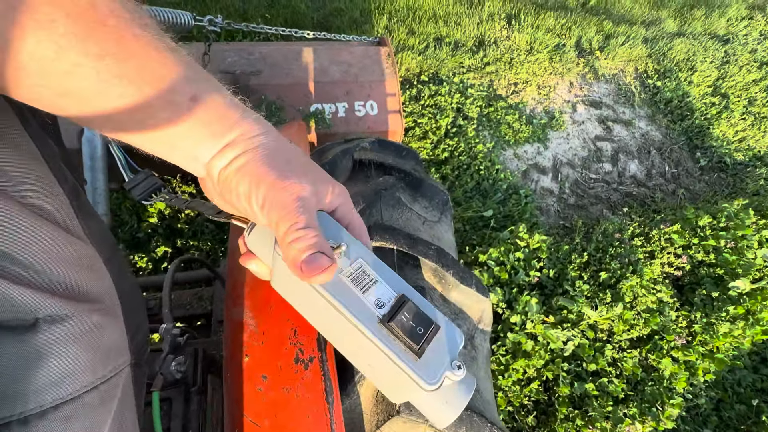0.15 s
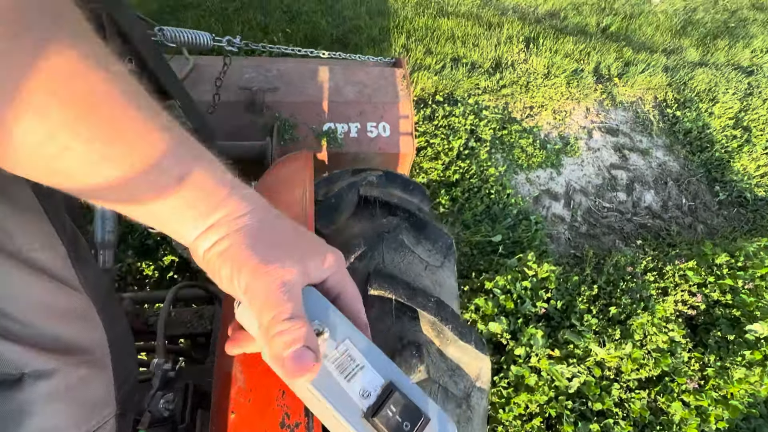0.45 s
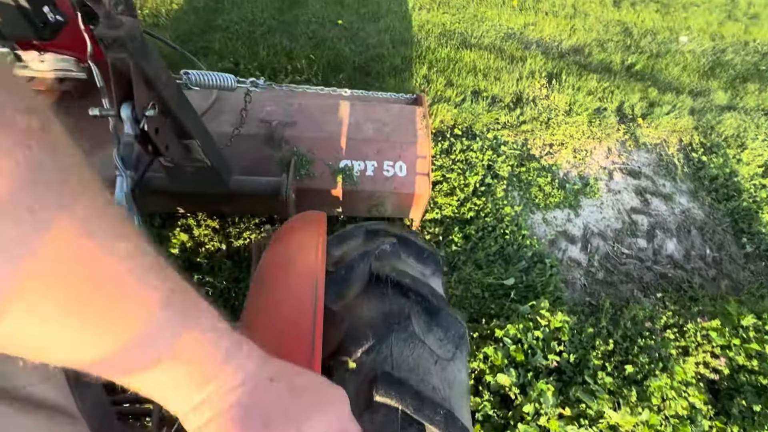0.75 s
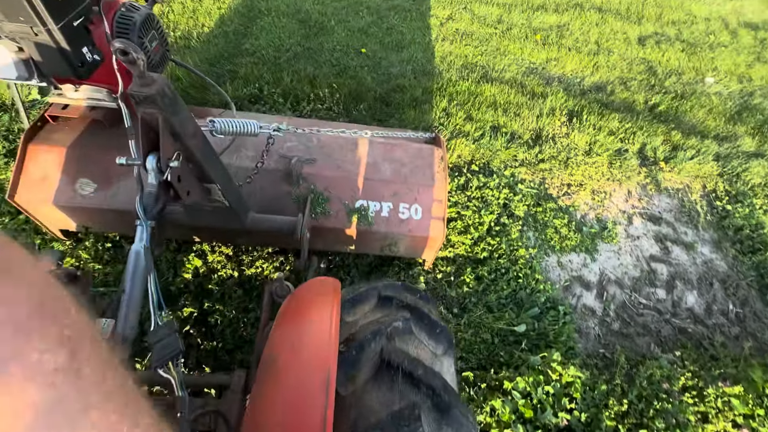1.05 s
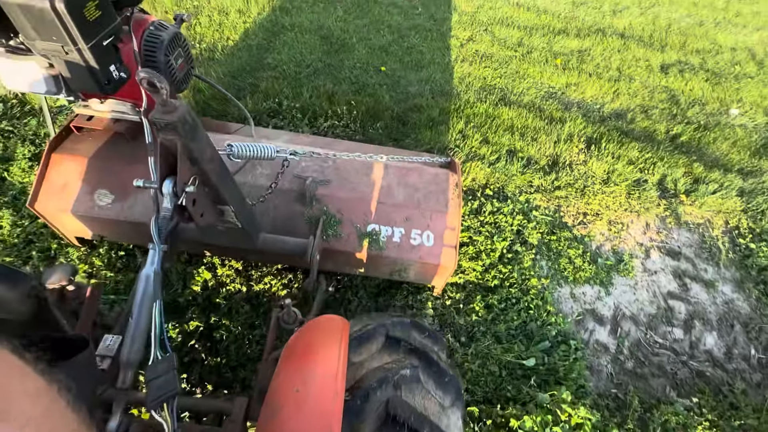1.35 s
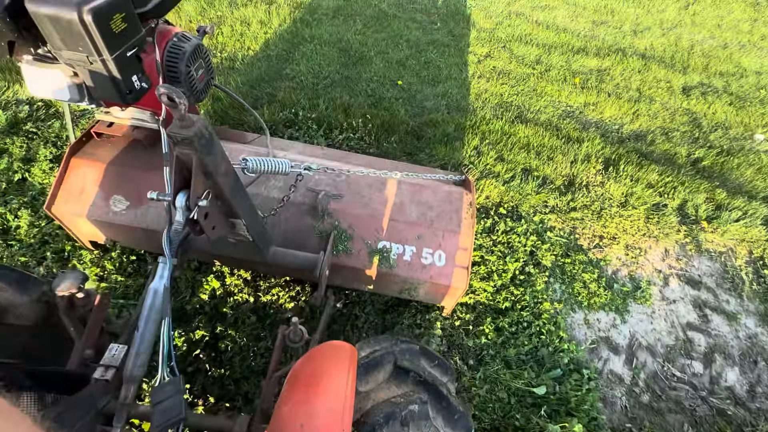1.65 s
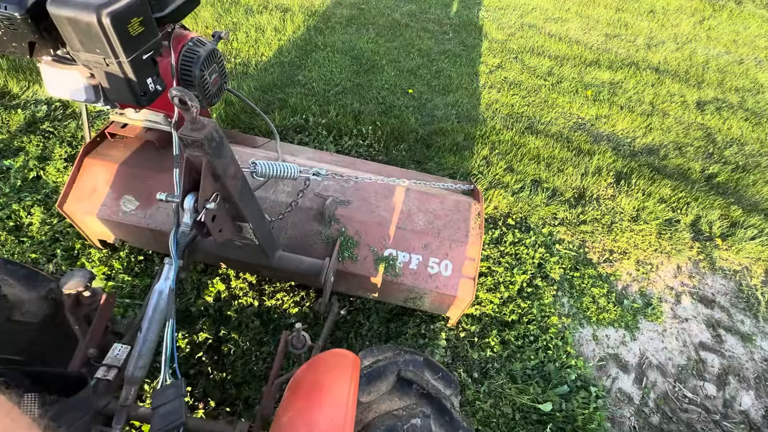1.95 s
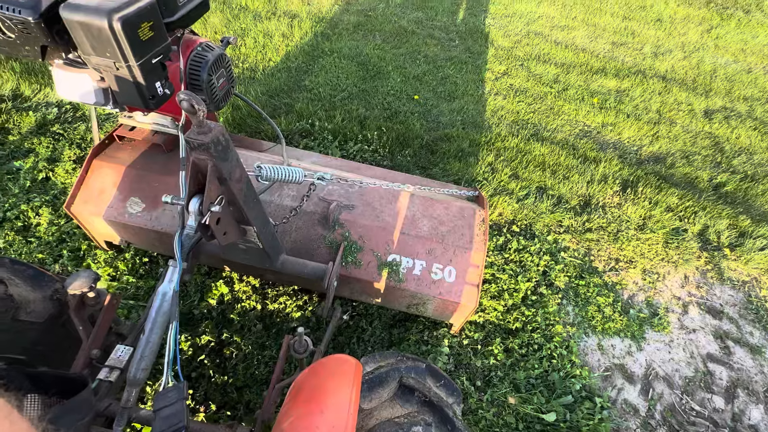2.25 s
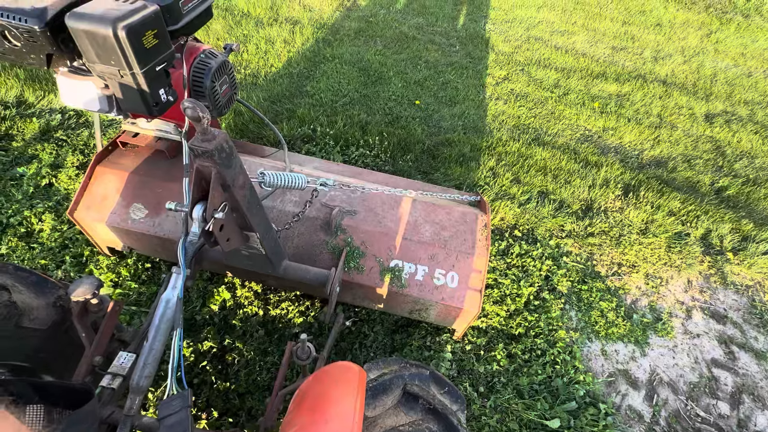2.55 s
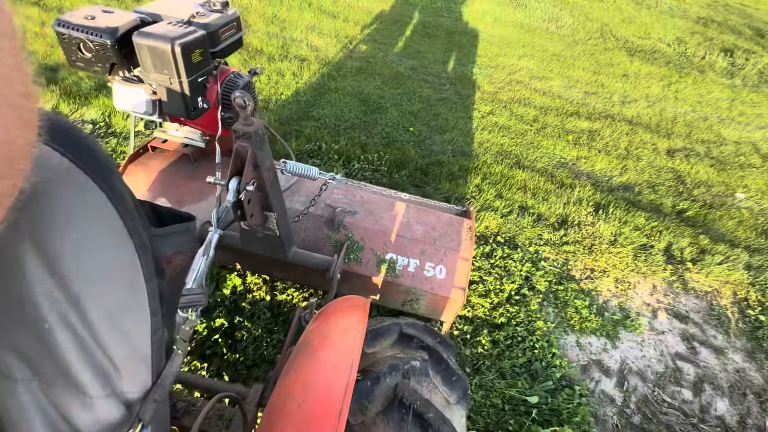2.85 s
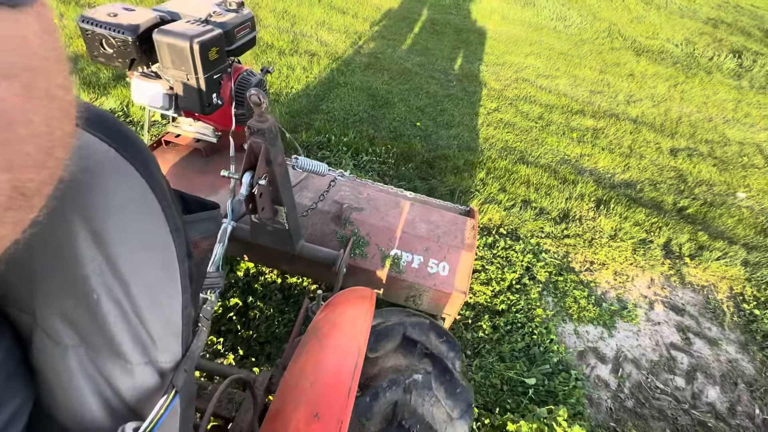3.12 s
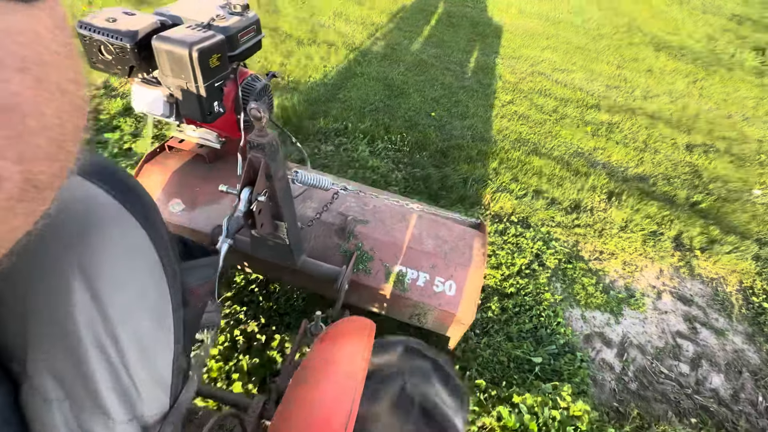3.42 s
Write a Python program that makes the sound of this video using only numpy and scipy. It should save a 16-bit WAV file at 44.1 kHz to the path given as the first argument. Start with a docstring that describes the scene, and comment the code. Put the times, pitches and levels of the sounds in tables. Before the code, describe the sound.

A flail mower's single-cylinder engine chugs low with hissy exhaust puffs and valve ticks, revs up from about 0.2 to 1.2 seconds, then holds speed to 3.6. Low rotor roar, ringing steel and a fluctuating hood whine surround it; a tractor diesel idles alongside. Wind rumbles at the start and around 0.8-1.2. Close outdoor handheld stereo turns around 0.75-1.4; tone and balance jump abruptly at 2.6.

```python
"""A mower's single-cylinder engine revs up to working speed: firing harmonics, exhaust puffs, valve ticks,
ringing casing and whining hood follow one speed curve. Beside it a tractor diesel idles, made of harmonics
and gated noise. The flail rotor roars in its steel hood, as random spectra, and wind rumbles on the ports.
A handheld two-microphone camera turns once; later the colour and balance change abruptly."""
import sys
import numpy as np
from scipy import signal
from scipy.fft import rfft, irfft
from scipy.io import wavfile
from scipy.ndimage import uniform_filter1d

SR = 44100
rng = np.random.default_rng(int(sys.argv[2]) if len(sys.argv) > 2 else 0)


def wav_out(sig):
    """Save sig, one row per channel (or a flat mono array), as 16-bit PCM at SR to the path in sys.argv[1]."""
    wavfile.write(sys.argv[1], SR, np.round(np.clip(np.atleast_2d(sig).T, -1, 1) * 32767).astype(np.int16))


def linear_from_db(decibels):
    """Turn decibels (scalar or array-like) into linear amplitude factors; 0 gives 1."""
    return 10 ** (np.asarray(decibels, float) / 20)


N = 157878
T = np.arange(N) / SR

# how hard the mower works: (time [s], puff and valve level [dB], weak harmonic and thump gain [dB],
# roar gain [dB], casing ring level [dB])
MOWER_LOAD = [(0, -35, 4.5, -0.5, -53), (.3, -35.5, 2, 1, -38), (.5, -36.5, 2.5, 1.5, -43),
              (.66, -32, 5, 3, -45), (.8, -36, 3, 3.5, -39.5), (.95, -35, 3.5, 0.5, -63),
              (1.25, -39.5, -2.5, 0.5, -51), (1.7, -44, -8.5, 0, -48.5), (2.55, -46.5, -10, 1.5, -51.5),
              (2.6, -45.5, -3, -1, -48.5), (3.4, -45, -2, 0.5, -47), (3.58, -42.5, -0.5, 0.5, -48)]


def evened(x):
    """Scales a sound to rms 1."""
    return x / np.sqrt(np.mean(x ** 2) + 1e-20)


def read(points, hz, index=1):
    """Reads a table column at given frequencies, along a nearly logarithmic axis."""
    p = np.transpose(points)
    return np.interp(np.log(hz + 50), np.log(p[0] + 50), p[index])


def curve(rows, index=1):
    """Reads a table column at every sample time."""
    p = np.transpose(rows)
    return np.interp(T, p[0], p[index])


def slow(top_hz):
    """Slow random wandering of rms 1: sines from 0.5 Hz up, weaker as they quicken."""
    rates_hz = np.geomspace(.5, top_hz, num=16)
    sines = [np.sin(2 * np.pi * (f * T[::64] + rng.random())) / np.sqrt(f) for f in rates_hz]
    return evened(sum(sines)).repeat(64)[:N]


def band(x, edges_hz):
    """Passes the band between two edges."""
    return signal.sosfilt(signal.butter(2, edges_hz, "bandpass", fs=SR, output="sos"), x)


def shape(x, points):
    """Colours a sound with a table of gains over frequency."""
    return irfft(rfft(x) * linear_from_db(read(points, np.fft.rfftfreq(N, 1 / SR))), N)


def resonate(x, hz, width_hz):
    """One damped mode, scaled to rms 1: the input shifted down by hz, smoothed and shifted back."""
    turn, r = np.exp(2j * np.pi * hz * T), np.exp(-np.pi * width_hz / SR)
    smooth = signal.lfilter([1 - r], [1, -r], x / turn)
    return evened((turn * smooth).real)


def lead(hz):
    """Phase factor by which the left port leads the right."""
    # (frequency [Hz], lead of the left port [radians])
    port_lead = [(0, 0), (1720, 3), (2760, 7), (4000, 7.5), (10000, 8)]
    return np.exp(1j * np.interp(hz, *np.transpose(port_lead)))


def ports(x):
    """One coherent sound reaching the left port with its phase lead."""
    return np.array([irfft(rfft(x) * lead(np.fft.rfftfreq(N, 1 / SR)), N), x])


def bursts(turns, decay_s, spread_db):
    """One gate per firing, each of its own size, with a 2 ms rise and an exponential decay."""
    sizes = linear_from_db(spread_db * rng.standard_normal(400))
    hits = np.diff(np.floor(turns), prepend=np.floor(turns[0])) * sizes[turns.astype(int)]
    t = T[:4000]
    return signal.oaconvolve(hits, np.exp(-t / decay_s) * np.minimum(t / .002, 1))[:N]


def tone(turns, k, db, spread_turns):
    """One harmonic, wavering and drifting; the closer the starting phases, the harder the stack chugs."""
    waver_db, drift_turns = .8 * slow(7.1), .03 * slow(5)
    phase = k * turns + drift_turns + spread_turns * rng.standard_normal()
    return np.sqrt(2) * linear_from_db(db + waver_db) * np.cos(2 * np.pi * phase)


def wind():
    """Wind on the ports: low noise with a lumpy level, mostly shared by the two."""
    # (time [s], level [dB])
    rumble = [(0, -23), (.3, -41), (.5, -41), (.8, -32), (1.1, -35), (1.4, -56), (3.58, -48)]
    rumble_hz = (43.7, 80)
    common, left, right = rng.standard_normal((3, N))
    noise = np.array([common + 0.74 * left, common + 0.71 * right])
    low = band(band(noise, rumble_hz), rumble_hz)  # twice, for steeper edges
    return linear_from_db(curve(rumble) + 2 * slow(3.5)) * evened(low)


def roar():
    """Rotor and air roar as random spectra, over which a level pattern makes the treble sound patchy."""
    # (frequency [Hz], relative density [dB])
    roar_colour = [(20, -50), (35, -24), (55, -16), (100, -2.5), (170, -1), (265, -10), (350, -12.5),
                   (420, -13.5), (900, -25.5), (1270, -20), (1450, -22.5), (3000, -27), (7000, -33.5),
                   (10500, -41.5), (13500, -54.5), (15500, -42.5)]
    # (frequency [Hz], likeness of the two ports [-1 to 1])
    likeness = [(40, 0.48), (80, 0.56), (160, 1), (350, 0.41), (600, 0.91), (1000, 0.87), (1300, 0.089),
                (2200, 0.21), (3000, 0.53), (4500, 0.18), (10500, 0.1)]
    roar_db, flicker_db = -21.5, .8
    frames, hz = N // 256 + 5, np.fft.rfftfreq(1024, 1 / SR)
    a, b, c, d, pattern = rng.standard_normal((frames, 513, 5)).T

    # the level pattern, smoothed over bins and frames, is only heard and not a motion of the rotor
    pattern = evened(uniform_filter1d(uniform_filter1d(pattern, size=10, axis=0), size=8, axis=1))
    pattern_db = (1.0 + np.interp(hz, (6500, 12100), [0, 3.5]))[:, None]
    flicker = evened(uniform_filter1d(rng.standard_normal(frames), size=2))
    flicker = flicker * np.clip(hz / 4000, 0, 1)[:, None]

    same, left = np.clip(read(likeness, hz), -1, 1)[:, None], a + 1j * b
    right = same * left + np.sqrt(1 - same ** 2) * (c + 1j * d)
    z = np.array([left * lead(hz)[:, None], right])
    z *= linear_from_db(read(roar_colour, hz)[:, None] + pattern_db * pattern + flicker_db * flicker)
    sound = signal.istft(z, nperseg=1024, noverlap=768)[1][:, :N]
    return linear_from_db(roar_db + curve(MOWER_LOAD, index=3)) * evened(sound)


def tractor():
    """Idling diesel: firing harmonics, a rough exhaust beat and a clatter at each firing."""
    # (time [s], firing rate [1/s])
    idle_rate = [(0, 21.9), (2.55, 22.0), (2.6, 21.1), (3.58, 21.1)]
    # (multiple of the firing rate, level before nearness [dB])
    idle_harmonics = [(4, -34), (5, -34), (6, -36), (10, -37), (11, -39), (14, -37), (15, -31), (16, -30),
                      (17, -36), (18, -42), (21, -44)]
    # nearness, for all but the clatter: (time [s], gain [dB])
    nearness = [(0, 3), (.8, 3.5), (1.1, -1.5), (2.5, 0), (2.7, 0.5), (3.58, -2)]
    chug_db, chug_s, chug_hz = -35.5, 0.0084, (286, 409)
    knock_db, knock_s, knock_hz = -45.5, 0.01, (1480, 7150)
    size_spread_db = 1.8
    turns = np.cumsum(curve(idle_rate)) / SR + .12  # place of the firing in the cycle

    gate = bursts(turns, knock_s, size_spread_db)
    knock = [evened(band(gate * rng.standard_normal(N), knock_hz)) for _ in "LR"]
    beat = bursts(turns, chug_s, size_spread_db) * rng.standard_normal(N)
    chug = linear_from_db(chug_db) * evened(band(beat, chug_hz))
    hum = sum(tone(turns, k, db, spread_turns=.05) for k, db in idle_harmonics)
    return linear_from_db(curve(nearness)) * ports(hum + chug) + linear_from_db(knock_db) * np.array(knock)


def firing_hum(turns):
    """Harmonics of the mower's firing rate, with a rough low thump of noise at each firing."""
    # (time [s], levels of multiples 2, 4, 5, 6 and 7 of the firing rate [dB])
    strong_harmonics = [(.05, -34, -31, -31, -40, -27), (.25, -42, -31, -34, -33, -22),
                        (.42, -31, -40, -30, -35, -17.5), (.74, -27, -26, -22, -34, -17),
                        (.82, -26, -32, -17.5, -28, -33), (1.1, -29, -32, -18, -35, -31),
                        (1.27, -34, -34, -22, -31, -28), (1.45, -40, -27, -27, -28, -28),
                        (1.65, -37, -33, -22, -27, -27), (1.85, -40, -23, -33, -25, -29),
                        (2.05, -40, -27, -25, -24, -30), (2.25, -37, -29, -29, -26, -29),
                        (2.45, -34, -25, -23, -29, -31), (2.65, -35, -31, -28, -31, -29),
                        (2.85, -43, -24, -33, -29, -31), (3.05, -36, -30, -30, -26, -31),
                        (3.25, -36, -33, -29, -25, -34), (3.42, -39, -19, -27, -27, -32),
                        (3.58, -36, -28, -27, -30, -32)]
    # (multiple of the firing rate, level before the load gain [dB])
    weak_harmonics = [(3, -38), (8, -33), (9, -33.5), (10, -38.5), (11, -32), (12, -35), (13, -40),
                      (15, -37.5), (16, -43.5), (17, -49.5), (19, -44)]
    thump_db, thump_s, thump_hz = -37, 0.032, (150, 950)
    spread_turns = .35
    strong = sum(tone(turns, k, curve(strong_harmonics, index=i + 1), spread_turns)
                 for i, k in enumerate((2, 4, 5, 6, 7)))
    weak = sum(tone(turns, k, db, spread_turns) for k, db in weak_harmonics)
    beat = bursts(turns, thump_s, spread_db=1.8) * rng.standard_normal(N)
    thump = linear_from_db(thump_db) * evened(band(beat, thump_hz))
    return strong + linear_from_db(curve(MOWER_LOAD, index=2)) * (thump + weak)


def exhaust_puffs(turns):
    """A puff of coloured hiss at each firing, with separate noise at each port."""
    # (frequency [Hz], relative level [dB])
    puff_colour = [(800, -2), (2000, 4), (3500, 2.5), (5000, -4), (9000, -2), (12000, -11.5),
                   (15000, -15.5)]
    gate = bursts(turns, decay_s=.011, spread_db=2.1)
    return np.array([evened(shape(gate * rng.standard_normal(N), puff_colour)) for _ in "LR"])


def valve_ticks(turns):
    """Valve gear modes struck by a short burst of noise at each firing."""
    # (frequency [Hz], relative level [dB], time to fall by about 55 dB [s])
    valve_modes = [(4450, -1, .012), (4970, 0, .025), (5750, -2, .015), (7000, -4, .008)]
    ticks = np.zeros((2, N))
    for port in range(2):
        for hz, db, fall_s in valve_modes:
            strike = bursts(turns, decay_s=0.005, spread_db=4.5) * rng.standard_normal(N)
            ticks[port] += linear_from_db(db) * resonate(strike, hz, 2.0 / fall_s)
    return linear_from_db(-8) * ticks


def ringing_steel(turns):
    """Casing ring and hood whine: modes driven by a jittered click at each firing and faint noise."""
    # casing: (frequency [Hz], width [Hz], relative level [dB])
    casing_modes = [(1790, 40, -2), (1940, 12, -2), (2900, 90, -2), (840, 35, 1)]
    # hood: (frequency [Hz], width of each of two passes [Hz], relative level [dB])
    hood_modes = [(1258, 45, 0), (2945, 55, -11)]
    # hood whine: (time [s], level [dB])
    whine_level = [(0.0, -49), (0.29, -36), (1.21, -43), (1.31, -31), (1.37, -56), (1.45, -31), (1.63, -53),
                   (1.7, -29.5), (1.79, -41), (2.05, -33), (2.24, -38.5), (2.31, -39), (2.44, -35),
                   (2.47, -47), (2.51, -33), (2.63, -50), (2.9, -38), (2.95, -64), (3.42, -46), (3.58, -33)]
    jitter_s = .00006
    at = np.flatnonzero(np.diff(np.floor(turns)))
    jitter = np.round(jitter_s * SR * rng.standard_normal(400)[:len(at)]).astype(int)
    drive = .35 * rng.standard_normal(N)
    drive[np.clip(at + jitter, 0, N - 1)] += 30
    ring = sum(linear_from_db(db + 1.6 * slow(9)) * resonate(drive, hz, width) for hz, width, db in casing_modes)
    whine = sum(linear_from_db(db) * resonate(resonate(drive, hz, width), hz, width) for hz, width, db in hood_modes)
    return linear_from_db(curve(MOWER_LOAD, index=4)) * ring + linear_from_db(curve(whine_level)) * whine


def mower():
    """Single-cylinder engine: every part is timed by the same firings, on one speed curve."""
    # (time [s], firing rate [1/s])
    engine_rate = [(0, 21), (.17, 20.9), (.28, 21.9), (.55, 26.2), (.74, 28.4), (.85, 29.5), (.95, 30.1),
                   (1.19, 31.0), (1.75, 31.4), (2.48, 31.4), (2.7, 31.2), (3.58, 31.2)]
    turns = np.cumsum(curve(engine_rate)) / SR + .74  # place of the puff in the cycle
    hiss = exhaust_puffs(turns) + valve_ticks(turns)
    return ports(firing_hum(turns) + ringing_steel(turns)) + linear_from_db(curve(MOWER_LOAD)) * hiss


def scene():
    """Everything that reaches the two ports."""
    return wind() + roar() + tractor() + mower()


def low_pass(x):
    """Removes everything above the highest recorded frequency."""
    return signal.sosfilt(signal.butter(12, 15680, fs=SR, output="sos"), x)


def record(dry):
    """The camera's direction, a later abrupt change of colour and the microphone dips colour each port; then
    the top octave is altered."""
    # colour of each port, in two camera directions and then after the abrupt change: (frequency [Hz], left gain
    # [dB], right gain [dB])
    at_hand = [(150, -3.5, -2), (433, -1.5, -1.5), (730, 5.5, 1), (1480, -1.5, -1), (2470, -1.5, -4.5),
               (5100, -7, 3), (8400, 1.5, 2.5), (11500, 3, 2.5)]
    at_mower = [(150, -2, 0), (377, -3.5, -2), (685, 3.5, 4), (1660, 5.5, -3.5), (2520, 2.5, -1.5),
                (4730, -2.5, 3), (8450, 3.5, 1.5), (12000, -2, 3.5)]
    late_colour = [(150, -2.5, 1), (426, -2.5, -1), (780, 10.5, 6), (1490, 2, 2.5), (2360, -4.5, -2.5),
                   (4940, -3, 6), (6200, -10.5, 3), (8600, 3.5, 5.5), (12000, 2, 4)]
    # changes of colour and balance, one gradual turn and one abrupt change: (start [s], end [s])
    colour_changes = [(.75, 1.41), (2.56, 2.575)]
    # microphone dips: (frequency [Hz], distance at which the dip is down to 1/e [Hz], gain [dB])
    mic_dips = [(5330, 70, -10), (7650, 160, -9)]
    # the top octave alternates between the sum and the difference of the ports:
    # (frequency [Hz], sum gain [dB], difference gain [dB])
    top_octave = [(9750, 0, 0), (9950, -22, 2), (10150, -22, 2), (10400, 2, 0), (11000, 3, -3),
                  (11250, 3, -45), (13550, 3, -45), (13750, 1, 0), (13950, -10, 3), (15600, -8.5, 3),
                  (15750, -60, -60)]
    hz, t, z = signal.stft(dry, SR, nperseg=1024, noverlap=768)
    first, second, third = (np.array([read(p, hz), read(p, hz, index=2)])[..., None]
                            for p in (at_hand, at_mower, late_colour))
    u, v = (np.interp(t, change, [0, 1]) for change in colour_changes)
    colour_db = first + (second - first) * u + (third - second) * v
    dips_db = sum(db * np.exp(-((hz - f) / width) ** 2) for f, width, db in mic_dips)[:, None]
    left, right = z * linear_from_db(colour_db + dips_db)

    both = (left + right) * linear_from_db(read(top_octave, hz))[:, None] / 2
    apart = (left - right) * linear_from_db(read(top_octave, hz, index=2))[:, None] / 2
    mix = signal.istft(np.array([both + apart, both - apart]), SR, nperseg=1024, noverlap=768)[1][:, :N]
    return low_pass(mix)


dry = scene()
out = record(dry)
wav_out(out)
```